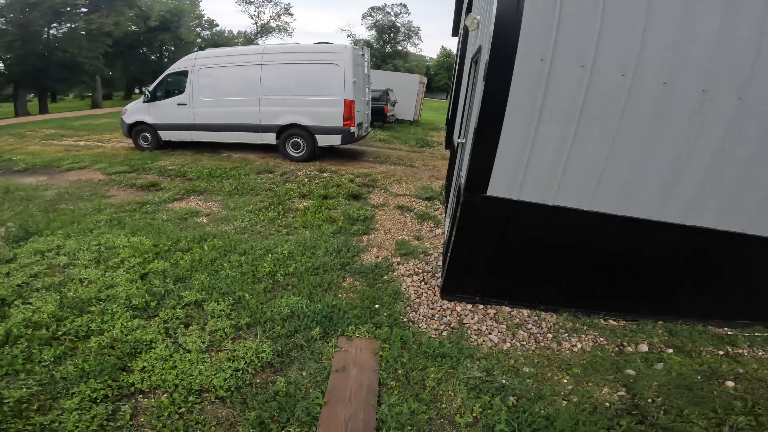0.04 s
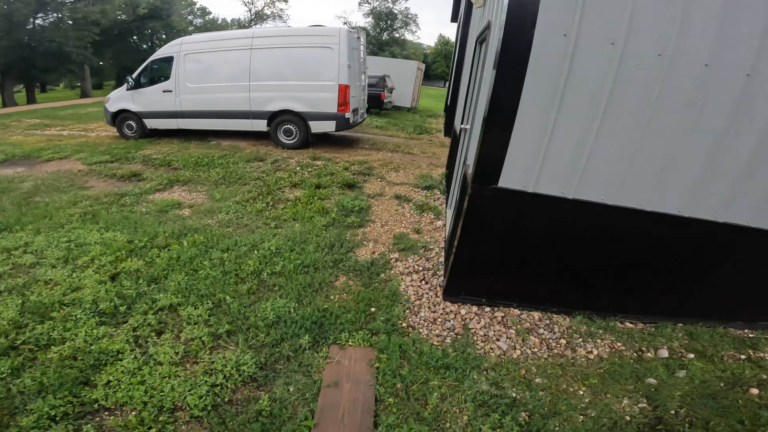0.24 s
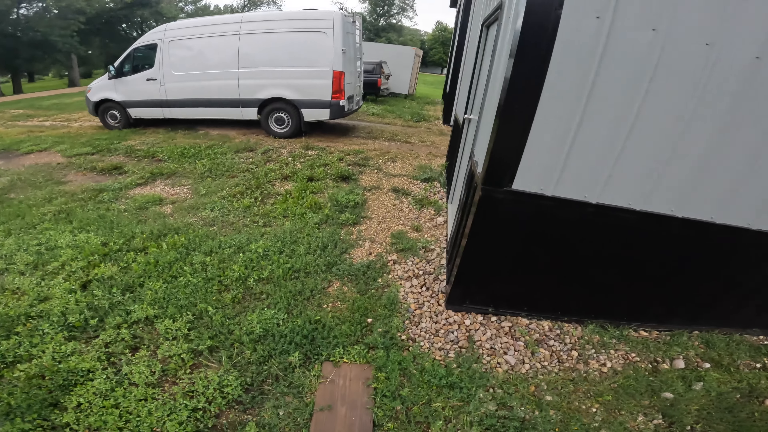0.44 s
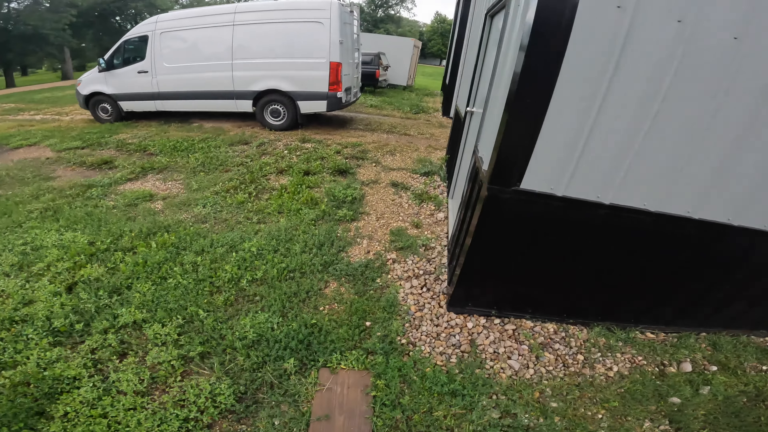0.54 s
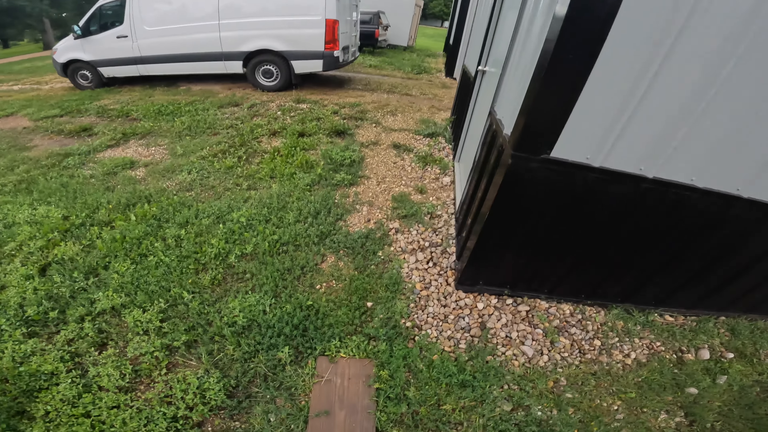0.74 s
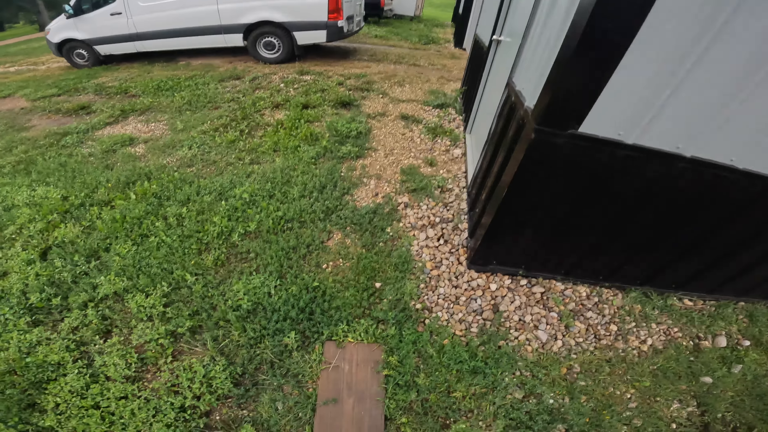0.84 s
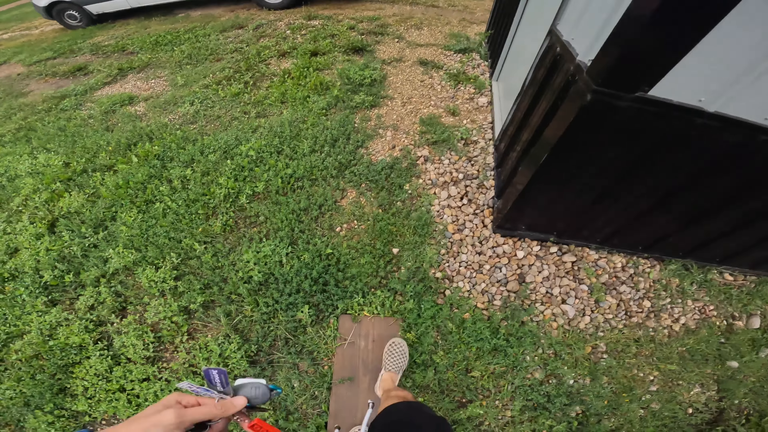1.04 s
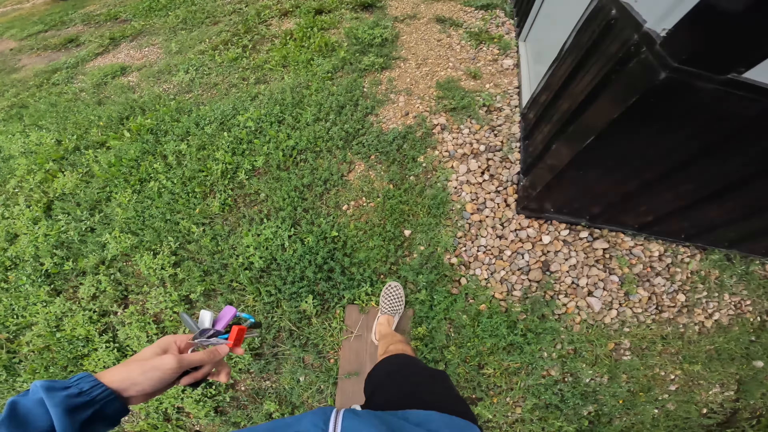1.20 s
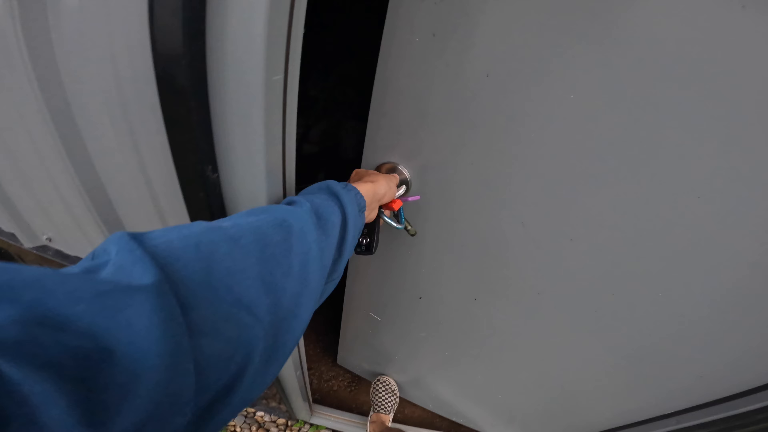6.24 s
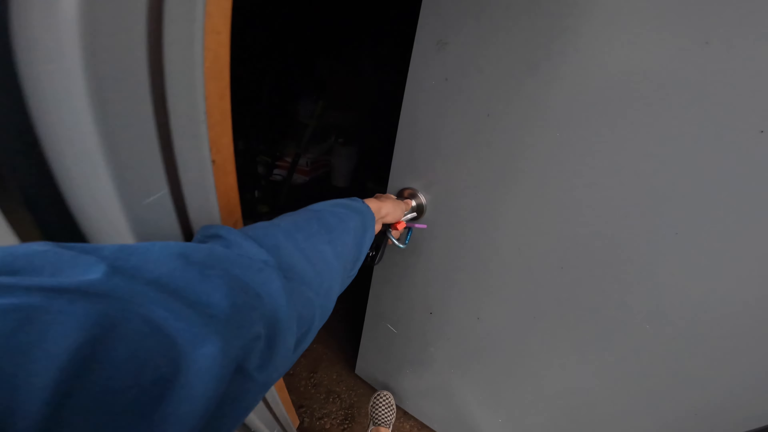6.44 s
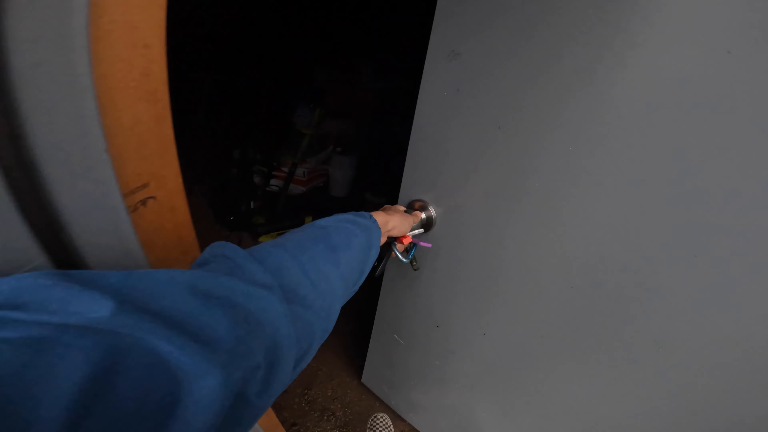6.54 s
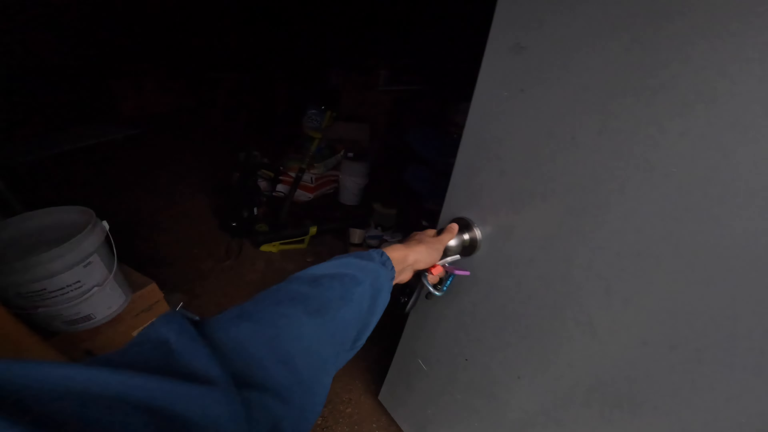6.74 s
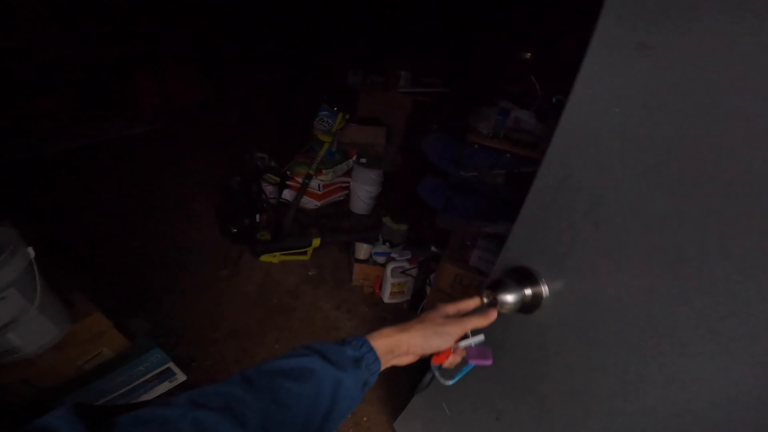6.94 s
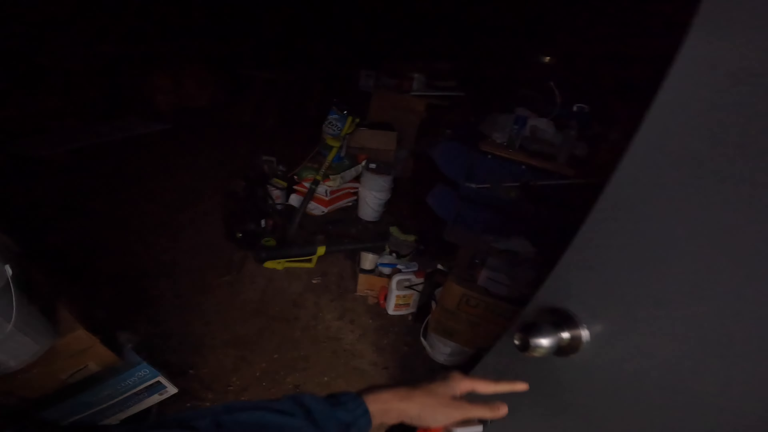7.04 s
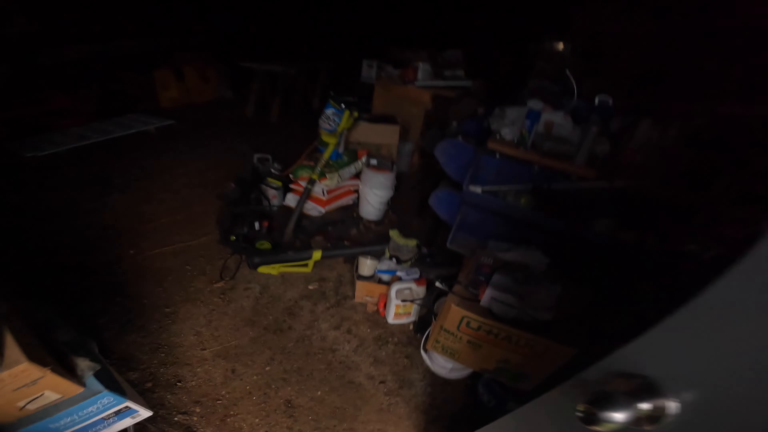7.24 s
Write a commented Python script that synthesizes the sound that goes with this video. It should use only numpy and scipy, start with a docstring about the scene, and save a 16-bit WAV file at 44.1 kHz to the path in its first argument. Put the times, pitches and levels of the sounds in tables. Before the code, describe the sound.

Quiet open air, close microphone on the walker, almost mono with faint scatter. From 0.15 to 1.2 s a bunch of keys jingles in quick irregular clinks, with a soft sandal slap near 0.7. A single key tinks at 1.5. Light gravel ticks lead to a sharp crunch at 2.5, with a faint raspy bird chirp at 2.2 and another at 3.3. Crunches and hard pebble clicks thicken from 3.4 to 4.8, loudest near 4.0, with dull booming steps at 4.1 and 4.4 and a sole scrape at 4.6. A dove coos softly far off at 4.7. A brief lull near 5 s ends in heavy thuds at 5.15 and 5.3. Keys and lock clack and rattle from 5.4 to 6.4, with a low push and rough scrape around 5.9 and a very sharp clack at 6. Fainter chirp at 6.5, soft knocks and dove coo at 6.85, last key jingles at 7.1.

```python
"""Quiet outdoor air throughout; a key bunch jingles near by as collisions ringing metal modes.
Sandals slap, then steps crunch and click over gravel: noise-excited pebble partials; single keys tink.
A small bird chirps far off as a warbled falling whistle; low rumble grows towards a metal shed.
Late steps thud in the shed's modes and the sole scrapes; a dove coos a sagging sine, far off.
After a brief lull the key and lock rattle and scrape, and the door is pushed open; the dove coos again."""
import sys
import numpy as np
from scipy import signal
from scipy.fft import rfft, irfft
from scipy.io import wavfile
from scipy.ndimage import uniform_filter1d

SR = 44100
rng = np.random.default_rng(int(sys.argv[2]) if len(sys.argv) > 2 else 0)


def unload_audio(sound):
    """Save the sound as a 16-bit wav file, at the path given as the first command line argument."""
    columns = np.transpose(np.atleast_2d(sound))
    # keep every value between -1 and 1, then stretch to whole-number steps
    steps = np.round(np.clip(columns, -1, 1) * 32767)
    wavfile.write(sys.argv[1], SR, steps.astype(np.int16))


N = 321489
TOP_HZ = 15850  # upper band limit
TIME = np.arange(N) / SR
HIT = np.arange(SR // 3) / SR  # time axis of one hit [s]


def undb(db):
    """Decibels to gain."""
    return 10 ** (np.asarray(db) / 20)


def unit(x):
    """Scale to rms 1."""
    return x / np.sqrt(np.mean(x ** 2))


def fade(t60_s):
    """Exponential decay over the length of one hit."""
    return np.exp(-np.log(1000) * HIT / max(t60_s, 1e-3))


def add(out, start_s, sound):
    """Mix a sound in at a time."""
    i = max(int(start_s * SR), 0)
    out[i:i + len(sound)] += sound[:max(N - i, 0)]


def band(x, hz, q):
    """Resonance with gain 1 at its centre."""
    hz = min(hz, .4 * SR)
    return signal.lfilter(*signal.iirpeak(hz, max(q, 3 * hz / SR), fs=SR), x)


def colour(x, points):
    """Causal minimum-phase filter through (frequency [Hz], gain [dB]) points."""
    size = 4096
    hz, db = np.transpose(points)
    bins_hz = np.arange(size // 2 + 1) * SR / size
    gain = undb(np.interp(np.log(bins_hz + 1), np.log(hz), db))
    cepstrum = irfft(np.log(gain))
    cepstrum[1:size // 2] *= 2  # fold to the causal side
    cepstrum[size // 2 + 1:] = 0
    impulse = irfft(np.exp(rfft(cepstrum)))
    return signal.fftconvolve(x, impulse)[:len(x)]


def walk(rate_hz):
    """Smooth random wandering with a spread near 1."""
    k = int(SR / rate_hz)
    steps = np.repeat(rng.standard_normal(N // k + 1), k)
    return 0.86 * uniform_filter1d(uniform_filter1d(steps, k), k)[:N]


def hit(x, db, crest_db):
    """Scale a hit to a nominal peak level that stands crest_db over its rms."""
    return unit(x) * undb(db - crest_db)


def grit(rate_hz, spread_db):
    """Random tiny impacts, most weak and a few strong."""
    sizes = undb(spread_db * np.minimum(rng.standard_exponential(N), 3.5))
    return (rng.random(N) < rate_hz / SR) * sizes * rng.choice([-1, 1], N)


SWELL_EDGE_DB = 20  # fall from full level over one swell or settling time


def swells(table):
    """Gain that swells to full level and settles afterwards; rows add in power."""
    power = 0
    for full_s, db, swell_s, settle_s in table:
        before = (full_s - TIME) / max(swell_s, .005)
        after = (TIME - full_s) / max(settle_s, .005)
        away = np.maximum(before, after)
        power = power + undb(db - SWELL_EDGE_DB * np.minimum(away, 10)) ** 2
    return np.sqrt(power)


LULL_FROM_S, LULL_UNTIL_S, LULL_DB = 4.83, 5.13, -13


def lull():
    """Gain for grit and air that sinks in a brief lull."""
    inside = (TIME > LULL_FROM_S) & (TIME < LULL_UNTIL_S)
    return undb(LULL_DB * uniform_filter1d(inside.astype(float), SR // 20))


# outdoor air spectrum: (frequency [Hz], gain [dB])
AIR_SPECTRUM = [(30, -16.5), (150, -5.5), (600, -2), (1500, -9.5), (4000, -7), (8000, -14.5),
                (16000, -36.5)]
# moving-body and shed rumble spectrum: (frequency [Hz], gain [dB])
RUMBLE_SPECTRUM = [(35, -21), (70, 3), (150, 2.5), (300, -5), (700, -12.5), (2000, -14.5), (12000, -35)]
# weight on the shed threshold and door: (time of full weight [s], level [dB], swell [s], settling [s])
SHED_LOADS = [(4.5, -37, 0.53, 0.29), (5.3, -39, 0.16, 0.63), (5.88, -27, 0.37, 0.47)]
RUMBLE_START_DB, RUMBLE_RISE_DB_PER_S, RUMBLE_TOP_DB = -71, 5.5, -46.5


def background():
    """Filtered-noise air, quietest at first, plus body rumble that grows and holds, and shed rumble."""
    air_db = np.interp(TIME, [0, 2], [-63, -57.5]) + walk(12.0)
    air = unit(colour(rng.standard_normal(N), AIR_SPECTRUM)) * undb(air_db)
    body_db = np.minimum(RUMBLE_START_DB + RUMBLE_RISE_DB_PER_S * TIME, RUMBLE_TOP_DB)
    rumble_gain = np.hypot(undb(body_db), swells(SHED_LOADS)) * undb(2 * walk(27))
    rumble = unit(colour(rng.standard_normal(N), RUMBLE_SPECTRUM)) * rumble_gain
    return air * np.sqrt(lull()) + rumble  # air dips half as many dB as the grit


# sole grinding into grit, then lock rattle and late rustle:
# (time of full level [s], level [dB], swell [s], settling [s])
GRIT_SWELLS = [(0.675, -34.5, 0.035, 0.42), (1.24, -41, 0.073, 0.2), (1.83, -36.5, 0.11, 0.087),
               (2.22, -44.5, 0.32, 0.75), (2.465, -23, 0.033, 0.038), (2.79, -37.5, 0.18, 0.31),
               (3.13, -35.5, 0.28, 0.21), (3.365, -25.5, 0.06, 0.085), (3.575, -28.5, 0.065, 0.24),
               (3.88, -24.5, 0.083, 0.12), (4.1, -25.5, 0.11, 0.55), (4.33, -25.5, 0.03, 0.4),
               (4.605, -19.5, 0.08, 0.11), (5.165, -20.5, 0.027, 0.045), (5.39, -28, 0.2, 0.27),
               (5.76, -22.5, 0.084, 0.49), (6.36, -26.5, 0.094, 0.12), (7.2, -40.5, 0.93, 1)]
LOOSE_GRIT_DB = -61  # grit trickling between swells


def crunch():
    """Gain of the grit layer: a steady trickle under the swells, sinking in the lull."""
    return np.hypot(swells(GRIT_SWELLS), undb(LOOSE_GRIT_DB)) * lull()


# gravel spectrum: (frequency [Hz], gain [dB])
GRAVEL_SPECTRUM = [(80, -59), (400, -11), (1200, -12.5), (2000, -5.5), (2900, -1.5), (5000, -4.5),
                   (8000, -5.5), (11000, -12.5), (16000, -14)]


def gravel():
    """Tiny impacts in clusters, each with a snap and short partials; also voices lock rattle and rustle."""
    count, size = 5500, 1024
    chance = rng.random((count, 7))
    force = undb(6.67 * np.minimum(-np.log(1 - chance[:, 1]), 3.5))
    partials_hz = (1200 + (TOP_HZ - 1200) * chance[:, 2:]).astype(np.float32)
    turn = (2 * np.pi * HIT[:size]).astype(np.float32)
    rings = sum(np.sin(np.outer(hz, turn)) for hz in partials_hz.T) * fade(0.036)[:size]
    snaps = rng.standard_normal((count, size)) * fade(0.0099)[:size]
    grains = force[:, None] * (unit(rings) + undb(-4.5) * unit(snaps))
    at = (chance[:, :1] * N).astype(int) + np.arange(size)
    pebbles = np.bincount(at.ravel(), grains.ravel(), N)[:N]
    clusters = undb(2.2 * walk(45))
    return unit(colour(pebbles, GRAVEL_SPECTRUM)) * crunch() * clusters


# key-bunch shakes: (time [s], nominal treble peak [dB], lower modes re treble [dB], nominal rattle length [s])
KEY_SHAKES = [(0.1502, -15.5, -13, 0.06), (0.236, -16.5, -14.5, 0.08), (0.2945, -15.5, -7.5, 0.077),
              (0.431, -25.5, 2.5, 0.041), (0.5198, -25, -6, 0.039), (0.6563, -13.5, 0.5, 0.033),
              (0.694, -14, -2, 0.064), (0.775, -22.5, -25, 0.047), (0.929, -19.5, -5.5, 0.029),
              (1.172, -21.5, -3, 0.041), (5.366, -5, -2, 0.022), (5.8002, -5.5, -3, 0.073),
              (6.0575, -10.5, -1.5, 0.041), (6.249, -11, -7, 0.02), (6.332, 0, -14.5, 0.023),
              (6.736, -17, -1, 0.055), (7.077, -6.5, -8, 0.065), (7.18, -8, -4, 0.08)]
# key-bunch modes: (frequency [Hz], nominal level [dB], nominal t60 [s])
KEY_BUNCH_MODES = [(3645, -5, .08), (4085, -7, .11), (4800, -4, .21), (6150, -4, .1), (7000, -1, .11),
                   (9590, -10, .12), (10330, -3, .18), (11998, -9, .18), (13080, -1, .14), (13730, -3, .08),
                   (13862, 0, .17), (15240, -4, .18)]


def keys():
    """A shake sets off a run of collisions; free-hanging keys ring on, a tight clatter damps them."""
    out = np.zeros(N)
    for start_s, db, low_db, length_s in KEY_SHAKES:
        progress, luck = rng.random(size=(2, 48))
        at = (progress * np.clip(0.92 * length_s, .005, .2) * SR).astype(int)
        force = undb(-16 * luck - 16 * np.abs(progress - .2))  # strongest a fifth of the way in
        ring = np.zeros(len(HIT))
        for hz, mode_db, t60_s in KEY_BUNCH_MODES:
            blows = np.bincount(at, force * rng.standard_normal(len(at)), len(HIT))
            damping = rng.uniform(.8, 2.6) * (1 + undb(low_db))
            detune = 1 + .004 * rng.standard_normal()
            share = rng.uniform(.2, 1)
            pole = np.exp((2j * np.pi * hz * detune - damping * np.log(1000) / t60_s) / SR)
            mode = unit(signal.lfilter([1], [1, -pole], blows).imag)
            ring += share * undb(mode_db + low_db * (hz < 9000)) * mode
        # metal scrapes on metal at every contact
        contact = signal.fftconvolve(np.bincount(at, force, len(HIT)), fade(0.0044))[:len(HIT)]
        tick_spectrum = [(500, -18.5), (1500, low_db - 10.5), (3200, low_db - 0.5),
                         (7000, low_db + 0.5), (10500, -0.5), (14000, -6.5)]
        ticks = colour(contact * rng.standard_normal(len(HIT)), tick_spectrum)
        jingle = undb(2.0) * unit(ring) + unit(ticks)
        add(out, start_s, hit(jingle, db + max(low_db, 0) / 2, crest_db=23.5))
    return out


# rubber-sandal slaps and dull door knocks: (time [s], nominal peak [dB], main ring [Hz])
SOFT_SLAPS = [(0.204, -33, 420), (0.726, -19, 393), (1.524, -36, 430), (1.791, -35.5, 748),
              (2.96, -34, 796), (3.002, -32, 1370), (3.058, -25.5, 1686), (3.381, -24.5, 582),
              (4.113, -19, 368), (4.434, -14, 336), (5.156, -17, 905), (5.246, -21, 1510),
              (5.293, -12, 375), (5.373, -10.5, 1052), (5.737, -16, 1093), (6.208, -21, 1086),
              (6.842, -17, 990), (6.851, -19, 940), (7.019, -33.5, 1600), (7.138, -36, 834)]


def slaps():
    """Broad noise smack plus a sole tone whose pitch drops as the sole flattens."""
    out = np.zeros(N)
    for start_s, db, hz in SOFT_SLAPS:
        push = rng.standard_normal(len(HIT)) * fade(0.069)
        sole_hz = hz * (0.54 + 0.706 * fade(0.053))
        sole = np.sin(2 * np.pi * np.cumsum(sole_hz) / SR) * fade(0.057)
        smack_spectrum = [(100, -15.0), (350, 9.5), (2000, 5.0), (4000, -8.0), (12000, -2)]
        smack = colour(band(push, hz, q=0.14), smack_spectrum)
        add(out, start_s, hit(unit(smack) + undb(-4.0) * unit(sole), db, crest_db=21.5))
    return out


# distinct hard contacts of pebbles, keys and lock, faint to loud: (time [s], nominal peak [dB], main ring [Hz])
HARD_CONTACTS = [(0.641, -25, 2620), (0.8094, -17, 10400), (0.837, -19.5, 12300), (0.8707, -21.5, 6900),
                 (0.9734, -20.5, 3950), (1.029, -23.5, 6300), (1.1113, -24, 5700), (1.212, -14, 6300),
                 (1.245, -18.5, 6500), (1.322, -26.5, 6750), (1.826, -23, 5050), (1.8635, -25, 6350),
                 (2.0146, -17, 7030), (2.15, -17, 5280), (2.28, -15, 6700), (2.3062, -20, 4300),
                 (2.366, -17.5, 5400), (2.461, -8, 7020), (2.4676, -8.5, 4150), (2.5536, -16.5, 8740),
                 (2.589, -16, 6800), (2.8475, -17.5, 5440), (2.8748, -15.5, 7800), (3.1224, -19.5, 2300),
                 (3.3857, -6.5, 6600), (3.436, -11, 2370), (3.486, -10, 3270), (3.5693, -8.5, 4600),
                 (3.6378, -14, 5550), (3.691, -7.5, 4800), (3.9474, -13, 2460), (3.9885, -4.5, 3020),
                 (3.997, 1, 5330), (4.0361, -6.5, 4840), (4.0616, -2.5, 4860), (4.069, -10, 4800),
                 (4.093, -6, 6600), (4.2496, -14, 4840), (4.3028, -11.5, 4100), (4.3942, -15.5, 3280),
                 (4.4399, -3.5, 4210), (4.4736, -5, 7000), (4.5308, -21, 8500), (4.5794, -9, 3200),
                 (4.597, -5.5, 4150), (4.652, -27, 2880), (4.7299, -6, 2930), (4.7901, -12, 3490),
                 (4.8198, -19, 3180), (4.964, -33, 2960), (4.99, -24, 2960), (5.067, -30, 2900),
                 (5.1424, -12.5, 1920), (5.1593, -9, 3140), (5.172, -10.5, 3070), (5.2956, -5, 2910),
                 (5.4122, -6, 1700), (5.8308, -3, 4270), (5.858, -4.5, 4150), (5.9778, 3.5, 4830),
                 (6.0547, -7.5, 3550), (6.2715, -11.5, 2530), (6.695, -14.5, 3840), (6.831, -22.5, 4570),
                 (7.0785, -17.5, 2600)]
STRAY_DB, STRAY_FOLLOW = -2, 0.52  # peak under a full-scale crunch; share of the crunch dB followed
STRAY_HZ, STRAY_OCTAVES = 5040, 0.74  # median ring and its spread


def stray_clicks(count):
    """Loose pebbles knock at random, harder as the crunch swells: (time [s], nominal peak [dB], ring [Hz])."""
    load = crunch()
    odds = load ** .3 * (TIME > HARD_CONTACTS[0][0]) * (TIME < LULL_FROM_S)
    at = np.searchsorted(np.cumsum(odds), rng.random(count) * odds.sum() * .999)
    db = STRAY_DB + STRAY_FOLLOW * 20 * np.log10(load[at])
    hz = STRAY_HZ * 2 ** (STRAY_OCTAVES * rng.standard_normal(count))
    return list(zip(TIME[at], db, hz))


CRACK_REACH = 4.4  # crack cutoff as a multiple of the ring: bigger bodies sound duller
REBOUND_DB = -2


def clicks():
    """Each contact chatters, rebounds once and rings a small hard body with short modes of its own."""
    out = np.zeros(N)
    for start_s, db, hz in HARD_CONTACTS + stray_clicks(count=48):
        envelope = fade(.028) + undb(5) * fade(.008) + undb(-34) * fade(.09)
        lag = int(rng.uniform(.001, .006) * SR)
        rebound = undb(REBOUND_DB) * np.pad(envelope, (lag, 0))[:len(HIT)]
        chatter = rng.standard_normal(len(HIT)) * np.hypot(envelope, rebound)
        partials_hz = np.clip(hz * np.exp(0.36 * rng.standard_normal((8, 1))), 1500, 15000)
        modes = np.sin(2 * np.pi * partials_hz * HIT).sum(axis=0) * fade(.032)
        ring = unit(band(chatter, hz, q=5.5)) + undb(-5.5) * unit(modes)
        crack_spectrum = [(60, -59), (300, -14.5), (1200, -11.0), (2600, 3.5),
                          (6500, 10.0), (9000, 2.5), (15000, 4.5)]
        crack = colour(chatter, crack_spectrum)
        crack = signal.lfilter(*signal.butter(2, min(CRACK_REACH * hz, TOP_HZ), fs=SR), crack)
        add(out, start_s, hit(ring + undb(-2.0) * unit(crack), db, crest_db=26.0))
    return out


# single flicked keys: (time [s], nominal peak [dB], note [Hz], t60 [s])
KEY_FLICKS = [(1.5264, -5.5, 6150, 0.019), (3.552, -15.5, 10200, 0.17), (4.196, -15, 8350, 0.037),
              (4.3162, -6.5, 7520, .028), (4.3347, -7.5, 7850, .022), (5.7276, -4, 6600, 0.014),
              (7.098, -24, 4640, 0.25)]
TINK_TWIN_RATIO, TINK_TWIN_DB, TINK_TICK_DB = 1.085, -9.5, -9.5


def tinks():
    """A flicked key ticks and rings a close pair of partials."""
    out = np.zeros(N)
    for start_s, db, hz, t60_s in KEY_FLICKS:
        turn = 2 * np.pi * hz * HIT
        twin = undb(TINK_TWIN_DB) * np.sin(TINK_TWIN_RATIO * turn)
        note = (np.sin(turn) + twin) * fade(t60_s)
        tick = band(rng.standard_normal(len(HIT)) * fade(0.0087), hz, q=1)
        add(out, start_s, hit(unit(note) + undb(TINK_TICK_DB) * unit(tick), db, crest_db=26.5))
    return out


# small-bird chirps: (time [s], peak level [dB])
BIRD_CHIRPS = [(2.19, -41.5), (3.264, -36.5), (6.546, -40)]


def chirps():
    """Falling whistle with fast random warble, which makes it raspy."""
    out = np.zeros(N)
    for start_s, db in BIRD_CHIRPS:
        fall_hz = np.interp(HIT, [0, .05, .13], [4600, 3900, 3300])
        hz = fall_hz * (1 + 0.155 * walk(900)[:len(HIT)])
        swell = np.interp(HIT, [0, .03, .09, .17], [0, 1, 1, 0])
        add(out, start_s, undb(db) * swell * np.sin(2 * np.pi * np.cumsum(hz) / SR))
    return out


# heavy footfalls and bumps: (time [s], nominal peak [dB], main boom [Hz])
HEAVY_BLOWS = [(4.113, -17, 203), (4.16, -24.5, 248), (4.433, -11.5, 209), (4.504, -30, 200),
               (4.622, -25.5, 224), (4.746, -29, 149), (5.153, -10, 135), (5.168, -9, 101),
               (5.292, -5, 163), (5.374, -16, 190), (5.557, -21, 150)]
# threshold and door ring: (frequency [Hz], level [dB], t60 [s])
SHED_RING = [(69.4, 3.5, 0.28), (149.6, 8, 0.2), (252, 3.5, 0.25), (321, -3, 0.2)]


def thuds():
    """A heavy blow booms in the shed modes nearest its own pitch, with a noisy shudder."""
    out = np.zeros(N)
    for start_s, db, hz in HEAVY_BLOWS:
        boom = np.zeros(len(HIT))
        for mode_hz, mode_db, t60_s in SHED_RING:
            gain = undb(mode_db - 17.0 * abs(np.log2(mode_hz / hz)))
            boom += gain * np.sin(2 * np.pi * mode_hz * HIT) * fade(t60_s)
        push = rng.standard_normal(len(HIT)) * (fade(0.14) + undb(-16) * fade(0.73))
        shudder = band(band(push, hz, q=1.1), hz, q=.9)
        add(out, start_s, hit(unit(boom) + undb(-0.5) * unit(shudder), db, crest_db=17.5))
    return out


# sole, key-in-lock and door-frame scrapes: (time [s], nominal length [s], level [dB], centre [Hz], Q [1])
DRY_SCRAPES = [(4.58, 0.19, -32.5, 2810, 9), (5.876, 0.091, -21.5, 1040, 0.8),
               (5.877, 0.071, -28.5, 4430, 2.8), (5.972, 0.052, -23.5, 1360, 0.78)]


def scrapes():
    """Fine dense slips ring one resonance, swelling and letting go."""
    out = np.zeros(N)
    for start_s, length_s, db, hz, q in DRY_SCRAPES:
        slips = (grit(rate_hz=1200, spread_db=2.5) * undb(3 * walk(110)))[:len(HIT)]
        rough = signal.fftconvolve(slips, fade(0.0046))[:len(HIT)] * rng.standard_normal(len(HIT))
        rasp = unit(band(band(rough, hz, q=q), hz, q=.7))
        swell = np.interp(HIT / length_s, [0, .12, .8, 1.2], [0, 1, 1, 0])
        add(out, start_s, undb(db) * rasp * swell)
    return out


# dove coos: (time [s], length [s], starting pitch [Hz], level [dB])
DOVE_COOS = [(4.73, 0.44, 502, -46), (6.87, 0.33, 542, -49.5)]
COO_SAG_HZ_PER_S, COO_ATTACK_S, COO_RELEASE_S = 82, 0.033, 0.33


def coos():
    """Near-sine that sags in pitch with a slight waver."""
    out = np.zeros(N)
    for start_s, length_s, start_hz, db in DOVE_COOS:
        t = TIME[:int(length_s * SR)]
        hz = (start_hz - COO_SAG_HZ_PER_S * t) * (1 + 0.0028 * walk(28.0)[:len(t)])
        swell = np.clip(np.minimum(t / COO_ATTACK_S, (length_s - t) / COO_RELEASE_S), 0, 1)
        add(out, start_s, np.sqrt(2) * undb(db) * swell * np.sin(2 * np.pi * np.cumsum(hz) / SR))
    return out


def shaded(x, start_db, db_per_s):
    """Treble above 11 kHz starts bright and grows duller along the way."""
    top_db = start_db - db_per_s * TIME
    top = signal.sosfiltfilt(signal.butter(2, 11000, "high", fs=SR, output="sos"), x)
    return x + (undb(top_db) - 1) * top


def scattered(near):
    """Diffuse echo from ground and wall: convolution with decaying noise after a 6 ms gap."""
    scatter = rng.standard_normal(len(HIT)) * fade(0.16) * (HIT > .006)
    return signal.fftconvolve(near, scatter / np.linalg.norm(scatter))[:N]


# scatter grows as the shed comes near: (time [s], level [dB])
SCATTER_LEVEL = [(1.5, -17), (5.5, -13.5)]
STEPS_BRIGHT_DB, STEPS_DULLING_DB_PER_S = 19, 8
KEYS_BRIGHT_DB, KEYS_DULLING_DB_PER_S = 7.5, 3


def scene():
    """All sources with faint scatter, nearly alike in both ears."""
    steps = clicks() + gravel() + slaps() + thuds() + scrapes()
    steps = shaded(steps, STEPS_BRIGHT_DB, STEPS_DULLING_DB_PER_S)
    jingle = shaded(keys(), KEYS_BRIGHT_DB, KEYS_DULLING_DB_PER_S)
    near = steps + tinks() + jingle
    echo = scattered(near)
    echo_gain = undb(np.interp(TIME, *np.transpose(SCATTER_LEVEL)))
    mid = near + echo_gain * echo + chirps() + coos() + background()
    return mid + undb(-50) * echo * np.array([[1], [-1]])


def record(dry):
    """Cut the deepest bass, clip at full scale, then cut the top."""
    thin = signal.sosfilt(signal.butter(4, 42, "high", fs=SR, output="sos"), dry)
    low_pass = signal.ellip(10, .2, 70, TOP_HZ, fs=SR, output="sos")
    return signal.sosfilt(low_pass, np.clip(thin, -1, 1))


dry = scene()
out = record(dry)
unload_audio(out)
```